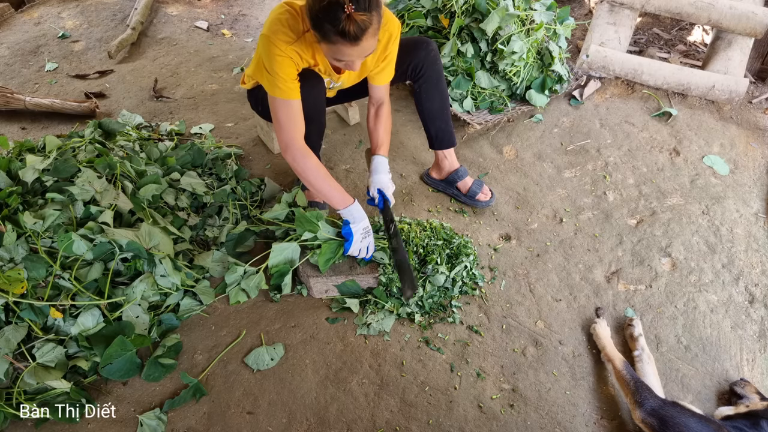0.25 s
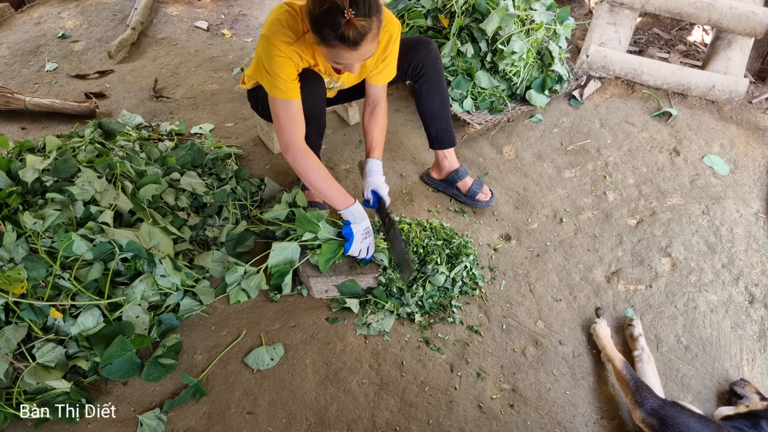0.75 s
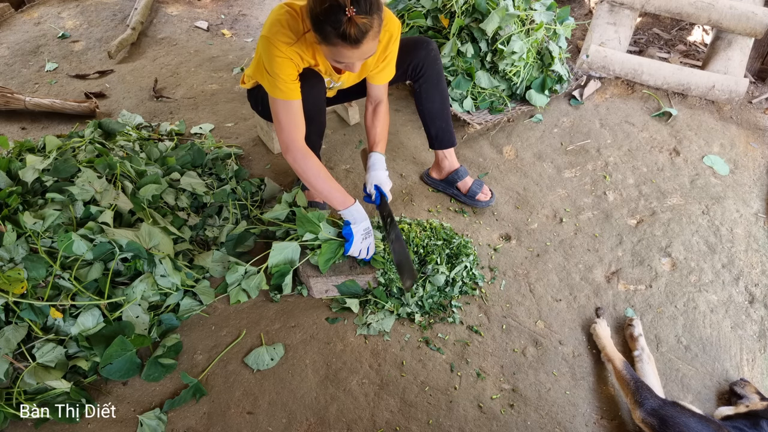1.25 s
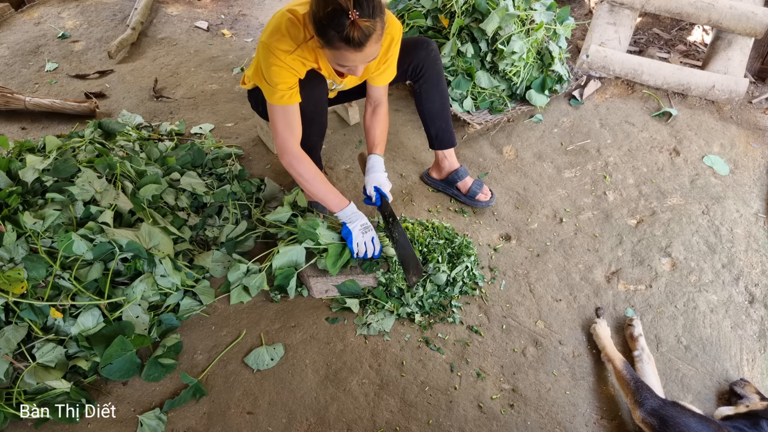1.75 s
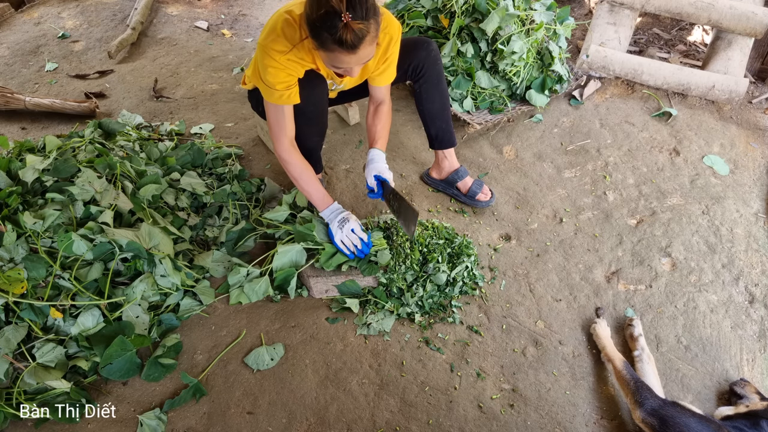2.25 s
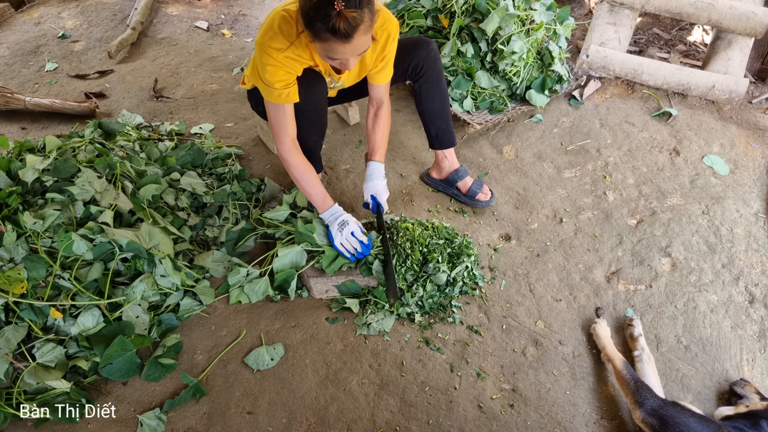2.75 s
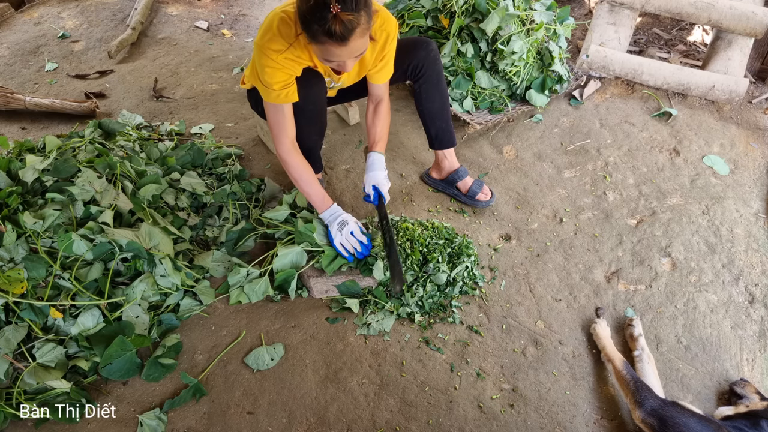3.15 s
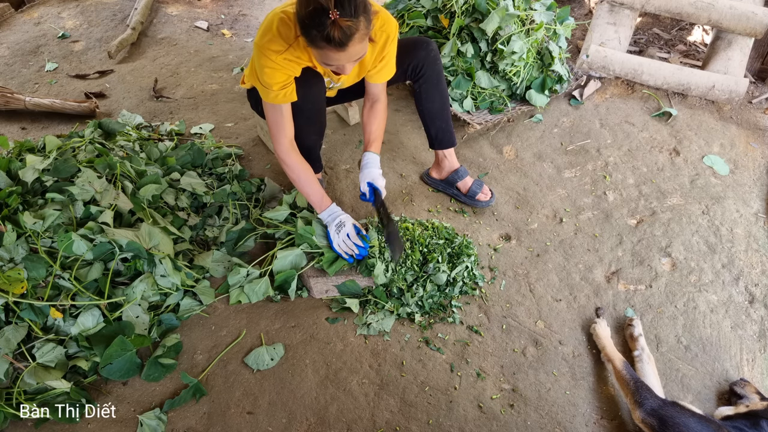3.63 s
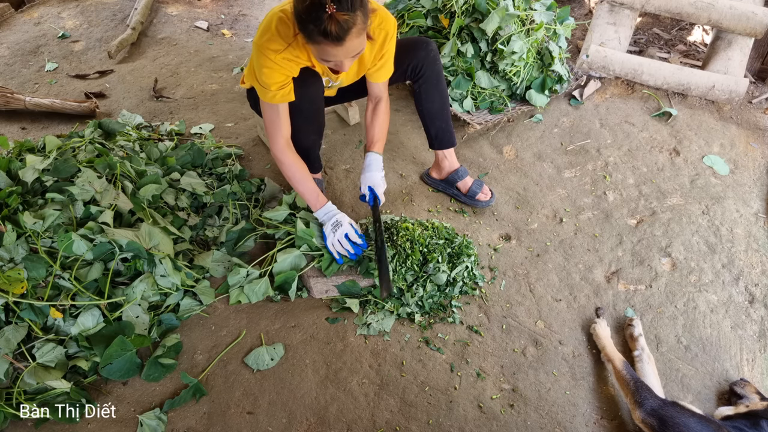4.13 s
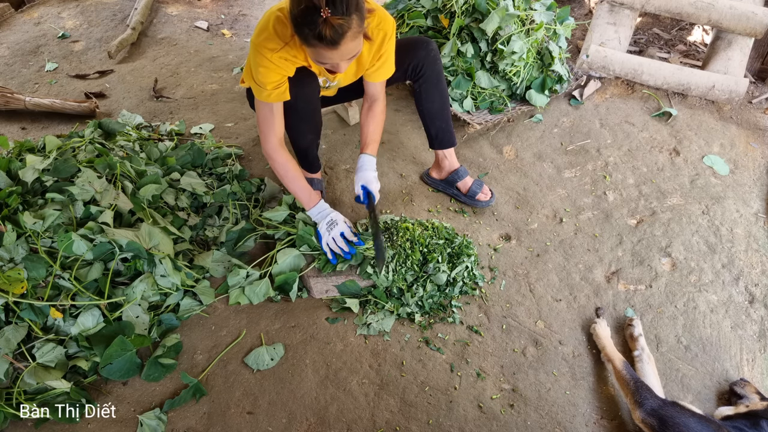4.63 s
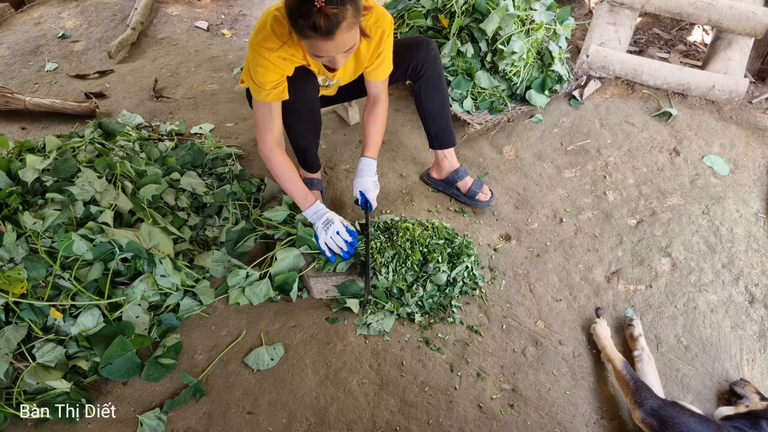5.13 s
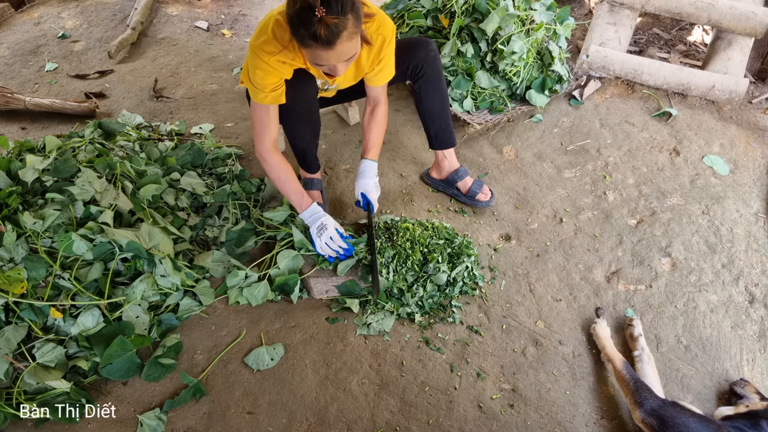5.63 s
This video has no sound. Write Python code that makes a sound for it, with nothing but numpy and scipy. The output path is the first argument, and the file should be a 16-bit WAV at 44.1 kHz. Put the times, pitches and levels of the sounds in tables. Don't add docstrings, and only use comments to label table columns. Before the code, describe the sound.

A heavy blade chops leafy vines on a wooden block about three times a second. Each stroke is a crisp wet snap, then a loud, short hollow knock with a low ground thump and quick yard reflections. Pauses fall after 1.5 and near 5.3 seconds, with small bumps and leaf rustles. Faint cicadas hiss slightly to the right; a dove hums far off. Close, clear stereo microphone.

```python
import sys
import numpy as np
from scipy import signal
from scipy.fft import rfft, irfft, next_fast_len
from scipy.io import wavfile
from scipy.ndimage import uniform_filter1d, map_coordinates

SR = 44100
rng = np.random.default_rng(int(sys.argv[2]) if len(sys.argv) > 2 else 0)


def transcribe(u):
    v = np.clip(np.atleast_2d(u).T, -1, 1)
    q = np.round(v * 32767).astype(np.int16)
    wavfile.write(sys.argv[1], SR, q)


def to_linear_factor(level_db):
    exponent = np.asarray(level_db, float) / 20
    return 10 ** exponent


N = 259308

# frequency_hz, density_db
CICADA_SPECTRUM = [(4500, -39.5), (6000, -26.5), (7200, -3), (8300, 2.5), (9200, -6), (10500, -15),
                   (13000, -44.5)]
# frequency_hz, density_db
DISTANT_SPECTRUM = [(400, -21), (800, -10), (1200, -6.5), (2200, -4.5), (3300, 0.5), (5000, -6.5),
                    (8000, -1.5), (16000, -34.5)]
# frequency_hz, density_db
LEAF_SPECTRUM = [(500, -30.5), (1500, -9.5), (4000, -7), (8000, -6), (12000, -8), (16000, -9)]
# frequency_hz, density_db
RUMBLE_SPECTRUM = [(18, -45.5), (40, -16.5), (85, -8), (160, -13.5), (300, -18.5), (550, -9.5), (800, -16),
                   (1200, -40.5)]
# time_s, level_db
STIR = [(0, -64), (.64, -68), (1.06, -65), (1.3, -61.5), (1.9, -60), (2.05, -58), (2.2, -64), (2.9, -64.5),
        (3.3, -62), (3.5, -67), (3.65, -60.5), (4.15, -60), (4.5, -61), (4.86, -68.5), (5.1, -60.5),
        (5.6, -66), (5.72, -63), (5.88, -61)]
# start_s, length_s, level_db
COOS = [(0, 0.19, -57.5), (0.285, 0.16, -64), (.79, 0.12, -70), (1.116, 0.072, -66.5),
        (1.356, 0.077, -56.5), (1.676, 0.153, -60.5), (2.045, 0.066, -54.5), (2.15, 0.065, -72),
        (2.273, .13, -60), (2.637, 0.11, -58), (2.932, 0.2, -63), (3.2, 0.16, -65), (3.531, 0.21, -64),
        (3.944, 0.144, -61), (4.22, 0.15, -65.5), (4.527, 0.059, -69.5), (4.701, 0.27, -62),
        (5.29, 0.14, -62), (5.511, 0.2, -64.5), (5.766, 0.041, -57.5)]
# start_s, start_pitch_hz, end_pitch_hz, length_s, level_db
FAINT_TONES = [(1.045, 3450, 3260, .1, -58), (1.053, 1150, 1172, .045, -58), (1.265, 2550, 2250, .05, -55),
               (1.36, 2050, 1990, .07, -58), (1.6, 2000, 1940, .05, -61), (1.658, 1440, 1500, .036, -62),
               (1.71, 2000, 1960, .05, -62), (1.9, 2690, 2600, .035, -60), (1.91, 2050, 1900, .04, -57),
               (2.242, 1556, 1452, .025, -57), (2.39, 1800, 1650, .04, -58), (2.725, 1063, 965, .05, -56),
               (3.543, 3520, 3480, .05, -62), (3.854, 2020, 2000, .035, -59), (4.2, 2000, 1900, .08, -60),
               (5.399, 9420, 9400, .28, -62), (5.645, 3460, 3460, .03, -55)]
# start_s, pitch_hz, level_db, t60_s
BUMPS = [(0, 92, -51.5, .3), (.936, 322, -35, .066), (1.645, 334, -27, .05), (1.655, 85, -47, .15),
         (1.67, 500, -34, .05), (1.73, 200, -58, .08), (1.882, 236, -42, .087), (1.94, 60, -54, .25),
         (2.368, 223, -55, .12), (4.619, 212, -46, .1), (4.762, 50, -55, .4), (5.625, 200, -59, .1),
         (5.81, 205, -32, .05), (5.815, 100, -33, .15)]
# start_s, level_db, length_s
RUSTLES = [
    (1.645, -53, .05),
    (1.72, -58, .04),
    (1.875, -53, .028),
    (1.925, -52, .03),
    (2.03, -56, .02),
    (2.07, -57, .035),
    (2.18, -58, .025),
    (4.25, -61, .03),
    (3.47, -58, .04),
]
# frequency_hz, t60_s
YARD_DECAY = [(300, 0.032), (1000, 0.098), (3000, .12), (8000, 0.14), (15000, 0.11)]
# delay_ms, left_db, right_db
SURFACES = [(0, 0, -2.4), (4.17, -14.5, -16), (5.4, -19, -35), (7.7, -35, -15), (11.86, -13.5, -15.5),
            (14.88, -10, -12.5), (17.9, -13, -18), (22.8, -22, -27), (26, -26, -28), (28.9, -25, -29),
            (30.5, -25, -29), (36.5, -34, -36)]
# frequency_hz, density_db
HOLLOW_SPECTRUM = [(110, -39.5), (170, -0.5), (350, -5.5), (650, 3.5), (900, -19.5), (1300, -51)]
# enter_s, level_db
CUTS = [(0.2108, -26.5), (0.5409, -25.5), (0.8692, -26.5), (1.1956, -27), (1.5201, -33), (2.458, -28.5),
        (2.78, -29.5), (3.1015, -33.5), (3.4256, -30.5), (3.758, -26.5), (4.0876, -26.5), (4.4118, -27.5),
        (4.745, -28.5), (5.0717, -32.5), (5.687, -28)]
# frequency_hz, density_db
STEM_SPECTRUM = [(150, -35), (250, -4.5), (1220, 0), (2960, -0.5), (3650, -2), (5440, -2), (8400, -5),
                 (11500, -9), (14900, -9), (16000, -15.5)]
# start_s, knock_db, crack_db, ground_db
CHOPS = [(0.2167, -2.5, -14.5, -37.5), (.546, -1.5, -18, -39.5), (0.8725, -2.5, -13, -40),
         (1.2013, -2.5, -12.5, -40.5), (1.5293, -2, -8.5, -36.5), (2.4632, -1, -10, -37),
         (2.7874, -6, -17.5, -40), (3.1094, -3.5, -13.5, -37.5), (3.4355, -22.5, -39, -49.5),
         (3.7612, -3.5, -10, -43.5), (4.093, -3.5, -14.5, -44.5), (4.4174, -1.5, -8.5, -40),
         (4.7501, -48.5, -39.5, -54.5), (5.0797, -2, -14.5, -39.5), (5.6859, -.5, -8, -35.5)]
# frequency_hz, width_hz, level_db
BLOCK_MODES = [(896, 150, 2.5), (1130, 250, 2.5), (1306, 130, 3.5), (1586, 140, 0), (1940, 540, 0.5),
               (2550, 260, -1), (3320, 370, -7), (3900, 360, -10.5), (6640, 150, -19.5)]
# frequency_hz, level_db, t60_s, arrival_ms
GROUND_MODES = [(45.7, -16.5, 0.11, 0), (74, -8, .22, -3), (105.2, -6, .24, 2), (140.94, -4, 0.1, 5),
                (172.6, -6, 0.084, 3), (205.6, 4.5, 0.057, 4), (294, -8, 0.081, 3.5), (64, -3, .06, 0.5)]
# frequency_hz, share of moments muted
MUTED_SHARE = [(1200, 0), (2500, .03), (5000, .08), (6300, .05), (6900, 0), (10300, 0), (11500, .1),
               (14800, .14), (15300, .85)]


def along(points, hz):
    f, v = np.transpose(points)
    return np.interp(np.log(hz + 1), np.log(f + 1), v)


def stir_curve():
    s, db = np.transpose(STIR)
    return np.interp(np.arange(N) / SR, s, db)


def unit(x):
    return x / np.sqrt(np.mean(x ** 2) + 1e-20)


def wobble(rate):
    knots = rng.standard_normal(int(N * rate / SR) + 4)
    return map_coordinates(knots, [np.arange(N) * rate / SR])


def filtered(x, response):
    m = next_fast_len(N + SR // 2)
    return irfft(rfft(x, m) * response(np.fft.rfftfreq(m, 1 / SR)), m)[..., :N]


def hiss(spectrum, alike, spiky_db=0, patchy_db=0):
    pair = rng.standard_normal((2, N)) * to_linear_factor(spiky_db * rng.exponential(size=N))
    if patchy_db:
        z = signal.stft(pair, nperseg=512)[2]
        field = uniform_filter1d(rng.standard_normal(z.shape[1:]), size=6, axis=0)
        field = uniform_filter1d(field, size=8, axis=1)
        pair = signal.istft(z * to_linear_factor(patchy_db * unit(field)), nperseg=512)[1][:, :N]

    def mid_side_response(hz):
        turn = np.arccos(np.clip(along(alike, hz), -1, 1)) / 2
        return to_linear_factor(along(spectrum, hz)) * [np.cos(turn), np.sin(turn)]

    mid, side = filtered(pair, mid_side_response)
    return unit(np.array([mid + side, mid - side]))


def add(track, s, sound):
    part = track[..., round(s * SR):][..., :sound.shape[-1]]
    part += sound[..., :part.shape[-1]]


def echoes(x, dull_hz):
    dull = filtered(x, lambda f: 1 / (1 + (f / dull_hz) ** 2))
    out = np.zeros((2, N))
    for ms, *db in SURFACES:
        add(out, ms / 1000, to_linear_factor(np.c_[db]) * (dull if ms else x))
    return out


def yard(x):
    size, out = SR // 4, np.zeros((2, N))
    parts = np.pad(x, (60, -(N + 60) % size)).reshape(-1, 1, size)
    hz, t, z = signal.stft(rng.standard_normal((len(parts), 2, SR // 6)), SR, nperseg=128)
    decay = to_linear_factor(-60 * t / along(YARD_DECAY, hz)[:, None])
    tails = signal.istft(z * decay, SR, nperseg=128)[1]
    tails = tails / np.linalg.norm(tails[:, :1], axis=2, keepdims=True)
    wet = signal.fftconvolve(parts, tails, axes=2)
    for k, part in enumerate(wet):
        add(out, k * size / SR, part)
    return out


def rumble():
    rest_db, shake_db, shake_t60_s = -83, -24, 2
    shake, t = np.full(N, to_linear_factor(rest_db)), np.arange(SR) / SR
    for s, *_, ground_db in CHOPS:
        add(shake, s, to_linear_factor(shake_db + ground_db - 60 * t / shake_t60_s))
    lumps_db = 1.5 * wobble(12)
    return shake * to_linear_factor(lumps_db) * hiss(RUMBLE_SPECTRUM, [(60, 0.78), (300, 0.52)])


def distant_yard():
    level_db = stir_curve() + 6 + wobble(7.7)
    noise = hiss(DISTANT_SPECTRUM, [(300, 0.17), (1400, 0.037)], patchy_db=3.0)
    return to_linear_factor(level_db) * noise * to_linear_factor([[.7], [-.7]])


def leaves():
    stir_db = stir_curve()
    level_db = -71.5 + 0.1 * (stir_db - stir_db.mean())
    return to_linear_factor(level_db + 10.0 + wobble(23)) * hiss(LEAF_SPECTRUM, [(8000, 0.0015)], patchy_db=1.5)


def cicadas():
    level_db = -52
    buzz = to_linear_factor(0.72 * wobble(270) + 0.53 * wobble(3.8) + 0.3 * wobble(3))
    return to_linear_factor(level_db) * buzz * hiss(CICADA_SPECTRUM, [(8000, 0.00036)]) * to_linear_factor([[-4], [2.5]])


def dove():
    attack_s, release_s, sag_db, murmur_db = 0.018, .03, -3, -72
    roll_s, roll_depth = .068, .75
    level, t = np.full(N, to_linear_factor(murmur_db)), np.arange(SR // 3) / SR
    roll = 1 - roll_depth * np.cos(np.pi * t / roll_s) ** 4
    for s, length, db in COOS:
        edges = np.clip(t / attack_s, 0, 1) * np.clip((length - t) / release_s, 0, 1)
        add(level, s, to_linear_factor(db + sag_db * t / length) * edges ** 2 * roll)
    flutter = to_linear_factor(3.5 * wobble(32))
    pitch_hz = 584 + 17 * wobble(70)
    stereo_drift = .9 * np.array([wobble(9), wobble(9)])
    hum = np.sin(2 * np.pi * np.cumsum(pitch_hz) / SR + stereo_drift)
    return level * to_linear_factor(4.5) * flutter * hum


def faint_tones():
    out, t = np.zeros((2, N)), np.arange(SR // 3) / SR
    waver = .024 * wobble(120)
    pan_db = np.array([[-1], [1]])
    for s, start_hz, end_hz, length, db in FAINT_TONES:
        u = np.clip(t / length, 0, 1)
        unsteady = waver[round(s * SR / 2):][:len(t)] * start_hz
        pitch_hz = start_hz + (end_hz - start_hz) * u + unsteady
        tone = np.sin(2 * np.pi * np.cumsum(pitch_hz) / SR)
        add(out, s, to_linear_factor(db + 3.5 + pan_db) * np.sqrt(np.abs(np.sin(np.pi * u))) * tone)
    return out


def bumps():
    rise_s = .006
    out, t = np.zeros((2, N)), np.arange(SR // 3) / SR
    for s, hz, db, t60 in BUMPS:
        rough = np.convolve(rng.standard_normal(len(t)), np.hanning(110) / 14, "same")
        envelope = to_linear_factor(db - 60 * t / t60) * (1 - np.exp(-t / rise_s))
        add(out, s, envelope * (np.sin(2 * np.pi * hz * t) + rough) * to_linear_factor([[1], [-1]]))
    return out


def rustles():
    bursts, t = np.zeros(N), np.arange(SR // 3) / SR
    for s, db, length in RUSTLES:
        add(bursts, s, to_linear_factor(db) * np.sin(np.pi * np.clip(t / length, 0, 1)) ** 2)
    return bursts * hiss(LEAF_SPECTRUM, [(1000, .7), (8000, .3)], spiky_db=3)


def small_sounds():
    tones = (faint_tones() + bumps()) * (.7 + .3 * wobble(45))
    return tones + to_linear_factor(-6) * yard(tones[0]) + rustles()


def hollow():
    under_knock_db, rise_s, t60_s = -33.5, 0.042, 0.2
    level, t = np.zeros(N), np.arange(SR // 3) / SR
    for s, knock_db, *_ in CHOPS:
        build_up = np.clip(t / rise_s, 0, 1) ** 2
        add(level, s, to_linear_factor(knock_db + under_knock_db - 60 * t / t60_s) * build_up)
    return level * hiss(HOLLOW_SPECTRUM, [(150, 1.0), (700, .6)]) * to_linear_factor([[1], [-1]])


def slices():
    stroke, t = np.zeros(N), np.arange(-SR // 25, SR // 8) / SR
    for (s, *_), (enter_s, db) in zip(CHOPS, CUTS):
        before_ms = np.minimum((t + s - enter_s) * 1000, 0)
        entry = to_linear_factor(2.7 * before_ms) + to_linear_factor(-14 + 1.5 * before_ms)
        after_ms = np.maximum(t * 1000 + 1.5, 0)
        settling = to_linear_factor(-1.6 * after_ms) + to_linear_factor(-14.0 - 0.29 * after_ms)
        add(stroke, s + t[0], to_linear_factor(db) * entry * settling)
    crackle = hiss(STEM_SPECTRUM, [(300, .95), (1400, .8), (3000, .5), (8000, .3)], spiky_db=1.7)
    snaps = stroke * to_linear_factor(1.2 * wobble(500) + 1.2 * wobble(150)) * crackle

    def lean(hz):
        lean_db = along([(1000, 2.5), (6000, 1.0), (9000, -6.5), (15000, -4)], hz)
        return to_linear_factor(np.outer([.5, -.5], lean_db))

    return to_linear_factor(0.5) * filtered(snaps + to_linear_factor(-6.5) * yard(snaps[0]), lean)


def ground_thump():
    ground, t = np.zeros(N), np.arange(SR // 2) / SR
    rise = 1 - np.exp(-t / 0.0061)
    for s, _, _, ground_db in CHOPS:
        for hz, db, t60, ms in GROUND_MODES:
            vary_db = 1.5 * rng.standard_normal()
            decay = to_linear_factor(-60 * (t / t60) ** 2.04) + to_linear_factor(-21.5 - 30 * t / t60)
            tone = np.sin(2 * np.pi * hz * (t - ms / 1000))
            add(ground, s, decay * to_linear_factor(ground_db + db + vary_db) * rise * tone)
    uneven = to_linear_factor(3.2 * wobble(35) + 1.3 * np.array([wobble(30), wobble(30)]))
    return ground * uneven * to_linear_factor([[5], [3]])


def block_knock():
    knock, t = np.zeros(N), np.arange(SR // 2) / SR
    swell = np.sin(np.pi * np.clip((t + 0.000069) / 0.0054, 0, 1) ** 0.79)
    for s, knock_db, _, _ in CHOPS:
        knock_hz = 657 + 4 * rng.standard_normal()
        add(knock, s, -to_linear_factor(knock_db + 0.5) * swell * np.sin(2 * np.pi * knock_hz * t))
    return knock


def resonance(f, modes):
    total = 0
    for k, (hz, width, db) in enumerate(modes):
        total = total + (-1) ** k * to_linear_factor(db) * 1j * f * width / (hz * hz - f * f + 1j * f * width)
    return total


def block_crack():
    contact_top_hz = 6900
    bite, t = np.zeros((2, N)), np.arange(200) / SR
    for s, knock_db, crack_db, _ in CHOPS:
        lower_db = -4.5 + 1.3 * knock_db
        splinter = 0.47 * rng.standard_normal(200)
        blow = to_linear_factor(10.5 - 60 * t / 0.018) * (splinter + 4 * (t == 0))
        add(bite, s + .0006, blow * to_linear_factor([[lower_db], [crack_db]]))

    def response(f):
        lower = resonance(f, BLOCK_MODES[:4])
        upper = resonance(f, BLOCK_MODES[4:]) / (1 + 1j * f / contact_top_hz) ** 2
        return [lower, upper]

    return filtered(bite, response).sum(axis=0)


def block():
    knock, crack = block_knock(), block_crack()
    near = echoes(knock, dull_hz=3000) + to_linear_factor([[3], [2]]) * echoes(crack, dull_hz=2480) + ground_thump()
    return near + yard(to_linear_factor(-19) * knock + to_linear_factor(0.5) * crack) * to_linear_factor([[.8], [-.8]])


def scene():
    background = rumble() + distant_yard() + leaves() + cicadas() + dove()
    return background + small_sounds() + hollow() + slices() + block()


def mute_weak_bands(x):
    hz, _, z = signal.stft(x, SR, nperseg=1024)
    power = np.abs(z[:, :512]).reshape(2, 64, 8, -1).mean(axis=(0, 2))
    power = uniform_filter1d(power * to_linear_factor(6 * rng.standard_normal(power.shape)), size=3, axis=1)
    rank = power.argsort(axis=1).argsort(axis=1) / power.shape[1]
    weak = np.repeat(rank < along(MUTED_SHARE, hz[4:512:8])[:, None], 8, axis=0)
    gain = np.pad(1 - .95 * weak, ((0, 1), (0, 0)))
    return signal.istft(z * gain, SR, nperseg=1024)[1][:, :N]


def roll_off(x):
    return signal.sosfilt(signal.butter(12, 16290, fs=SR, output="sos"), x)


def record(dry):
    clipped = dry / (1 + np.abs(dry / 1.02) ** 8) ** (1 / 8)
    limited = filtered(clipped, lambda hz: np.clip((15800 - hz) / 500, 0, 1))
    return roll_off(mute_weak_bands(limited))


dry = scene()
out = record(dry)
transcribe(out)
```